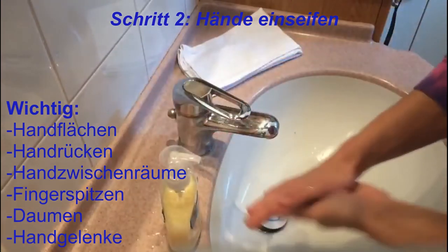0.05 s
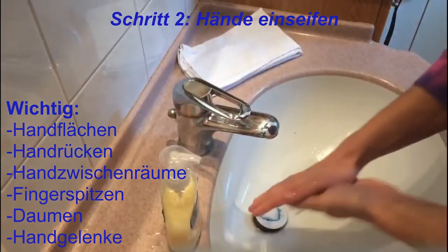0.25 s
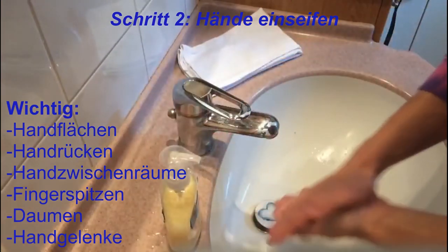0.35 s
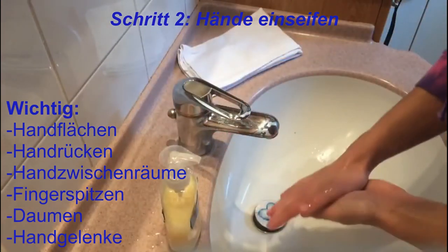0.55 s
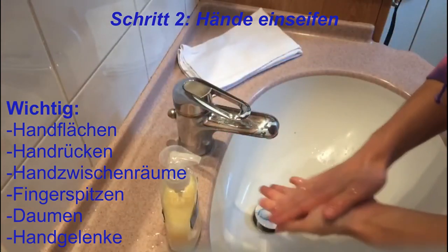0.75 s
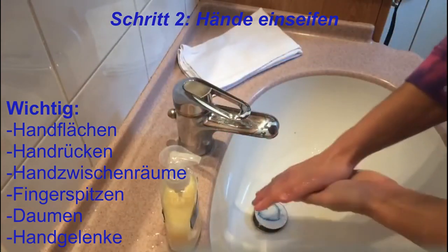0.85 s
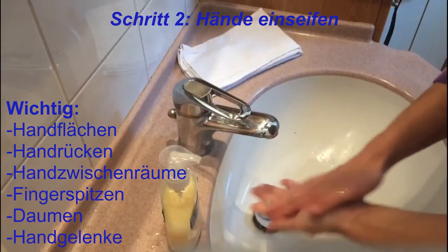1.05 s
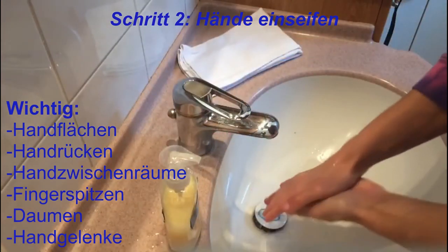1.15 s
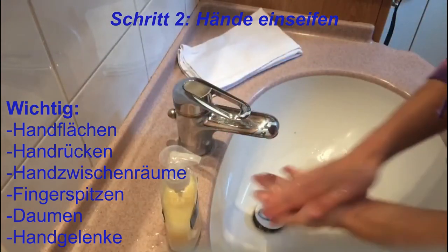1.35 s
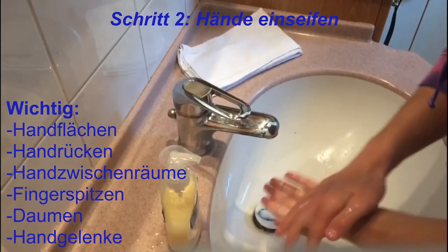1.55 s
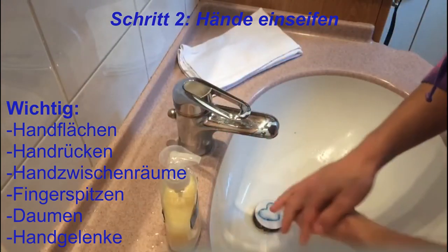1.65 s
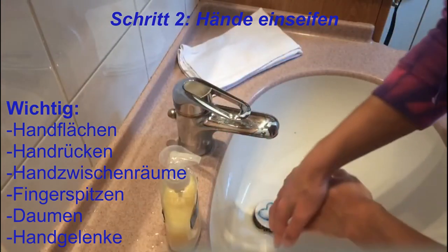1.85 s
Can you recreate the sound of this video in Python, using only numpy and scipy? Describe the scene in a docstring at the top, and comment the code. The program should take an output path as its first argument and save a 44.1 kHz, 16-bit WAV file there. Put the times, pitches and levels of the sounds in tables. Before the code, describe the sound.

Wet soapy hands rub together over a washbasin, making uneven soft squelches, slaps and small pops. Lather fizzes faintly between them, and the strongest squelches come in the second half. The small bathroom adds a short echo.

```python
"""Soapy hands over a washbasin

Wet palms meet in soft squelching slaps, trapped air pockets pop open and ring, and the lather
ticks and fizzes. The basin throws back quick reflections, the small tiled bathroom adds a short
tail, and a faint hum lies underneath."""
import sys
import numpy as np
from scipy import signal
from scipy.fft import rfft, irfft, next_fast_len
from scipy.io import wavfile

SR = 44100
rng = np.random.default_rng(int(sys.argv[2]) if len(sys.argv) > 2 else 0)


def file_out(sig):
    """Save sig as 16-bit WAV at sys.argv[1]."""
    # one column per channel
    cols = np.atleast_2d(sig).T
    # limit, then scale
    lim = np.clip(cols, -1, 1)
    pcm = np.round(lim * 32767).astype(np.int16)
    wavfile.write(sys.argv[1], SR, pcm)


N = 83790
EVENT_T = np.arange(SR // 10) / SR  # 100 ms for each slap, pop or snap
SLAP_ATTACK_S, BURST_ATTACK_S = 0.00082, 0.0003

# EQ of bursting lather, for slaps and pops: (frequency [Hz], gain [dB])
SPRAY_EQ = [(100, -22), (300, -11), (700, -3), (1500, -0.5), (3000, 3), (4300, 1.5), (5600, 2.5), (8000, 3),
            (10500, 0), (12500, -5)]
# Palm hits: (time [s], decay [s], squelch centre [Hz], squelch [dB], spray [dB], thump [dB], thud [dB])
PALM_HITS = [(0.182, 0.0049, 1380, -41.5, -54, -45, -52.5), (0.21, 0.0067, 1240, -39, -47, -46, -52.5),
             (0.4432, 0.0033, 1160, -41, -48, -46.5, -51.5), (0.482, 0.024, 1920, -52, -60, -48, -53.5),
             (0.503, 0.022, 1870, -48, -49, -57, -62), (0.805, 0.012, 1950, -50.5, -56, -58.5, -64),
             (0.932, 0.028, 2030, -52.5, -61, -62.5, -62.5), (1.035, 0.0091, 600, -70, -70, -51.5, -61),
             (1.0605, .012, 695, -45, -46, -42.5, -44.5), (1.063, 0.031, 1790, -31, -38, -36.5, -49.5),
             (1.267, 0.0059, 1240, -31.5, -41, -39.5, -56), (1.285, 0.0058, 1540, -41.5, -43, -40.5, -73),
             (1.337, 0.011, 2030, -40, -58, -62, -81), (1.4903, 0.015, 2250, -28.5, -34, -41, -48),
             (1.499, 0.016, 1620, -36, -47, -46, -54)]
def palm_slaps():
    """Lather squeezes out between the palms while the hollow of the hands thumps and the flesh thuds."""
    out, impulse = np.zeros(N), signal.unit_impulse(len(EVENT_T))
    for time_s, decay_s, hz, squelch_db, spray_db, thump_db, thud_db in PALM_HITS:
        rush = basin_reflections(crackle(decay_s, SLAP_ATTACK_S))
        squelch = at_level(band(rush, hz, octaves=1.29), squelch_db)
        splash = basin_reflections(crackle(decay_s, SLAP_ATTACK_S))
        spray = at_level(colour(splash, SPRAY_EQ), spray_db)
        thump = at_level(band(basin_reflections(impulse), hz=307.7, octaves=0.86), thump_db)
        thud = at_level(band(impulse, hz=162.5, octaves=0.94, order=1), thud_db)
        add(out, time_s, squelch + spray + thump + thud)
    return out


# Air pockets popping open: (time [s], pitch [Hz], ring t60 [s], ring [dB], spray [dB])
AIR_POCKETS = [(0.042, 2590, 0.0048, -47.5, -51.5), (0.176, 1240, 0.0062, -50, -55),
               (0.219, 1916, 0.012, -26.5, -38), (0.224, 2040, 0.024, -24.5, -39.5),
               (0.233, 4030, 0.01, -42, -47), (0.351, 2700, 0.0028, -38.5, -46.5),
               (0.364, 2130, 0.0027, -46.5, -68), (0.372, 1850, 0.0027, -46, -62),
               (0.409, 1580, 0.0084, -51.5, -66), (0.4432, 1304, 0.0095, -36, -51.5),
               (0.483, 905, 0.054, -41, -63), (0.509, 3100, 0.0033, -48.5, -65),
               (0.599, 1960, 0.004, -49.5, -60), (0.630, 1570, 0.0031, -47, -58),
               (0.64, 1884, .007, -74, -68), (0.7242, 3010, 0.0013, -38.5, -40),
               (0.738, 2950, 0.0056, -45, -70), (0.806, 2820, 0.0056, -50, -61),
               (0.878, 1513, 0.023, -51, -61), (0.937, 1680, 0.0063, -46, -60),
               (1.062, 2750, 0.011, -36, -37.5), (1.076, 3190, 0.0097, -33.5, -44),
               (1.216, 3150, 0.0042, -35, -38.5), (1.2195, 3640, 0.0034, -43, -40.5),
               (1.268, 1350, 0.0047, -38.5, -41), (1.275, 1510, 0.0023, -45, -43.5),
               (1.2926, 3280, 0.0043, -37.5, -59), (1.3373, 2340, 0.0044, -39, -46),
               (1.467, 2550, 0.0017, -47.5, -41.5), (1.473, 1760, 0.003, -36.5, -58),
               (1.4762, 2620, 0.0034, -38.5, -49), (1.4995, 4280, 0.0079, -35, -37.5),
               (1.611, 2410, 0.015, -50, -55.5), (1.793, 1850, 0.03, -61.5, -68),
               (1.804, 2160, 0.012, -55, -56.5)]
def air_pops():
    """Each pocket rings briefly, bending up in pitch, roughened by its wet rim, with a puff of spray."""
    out, t = np.zeros(N), EVENT_T
    attack_cycles, rise_per_s, width_octaves = 0.76, 1, 0.99
    for time_s, hz, t60, ring_db, spray_db in AIR_POCKETS:
        envelope = (1 - np.exp(-t * hz / attack_cycles)) * fade(t, t60)
        chirp = np.sin(2 * np.pi * hz * (t + rise_per_s * t * t / 2))
        ring = basin_reflections(band(envelope * chirp, hz, width_octaves, order=1))
        rim = band(crackle(t60 / 2, BURST_ATTACK_S), hz, width_octaves, order=3)
        puff = crackle(decay_s=0.0054, attack_s=BURST_ATTACK_S)
        spray = colour(basin_reflections(puff), SPRAY_EQ)
        pop = at_level(ring, ring_db) + at_level(rim, ring_db - 9.5) + at_level(spray, spray_db)
        add(out, time_s, pop)
    return out


# Soap films snapping: (time [s], centre [Hz], level [dB])
FILM_TICKS = [(0.0555, 9100, -45.5), (0.154, 9700, -61.5), (0.444, 10000, -51), (0.587, 9650, -55),
              (0.739, 10400, -36.5), (1.162, 9300, -59), (1.220, 7100, -38.5), (1.291, 7500, -38.5),
              (1.449, 8800, -54.5), (1.4933, 7600, -35), (1.867, 6700, -61)]
def film_snaps():
    """Thin films tear with a bright tick of only a few clicks."""
    out = np.zeros(N)
    for time_s, hz, db in FILM_TICKS:
        tear = crackle(decay_s=0.0015, attack_s=BURST_ATTACK_S, per_s=1500)
        tick = band(basin_reflections(tear), hz, octaves=0.69)
        add(out, time_s, at_level(tick, db))
    return out


# EQ of the foam: (frequency [Hz], gain [dB])
FOAM_EQ = [(200, -6), (700, 2.5), (1500, 2), (2500, 8.5), (4000, -7.5), (6000, -9), (10000, -13),
           (12500, -12)]
# Fader ride on the foam as the hands rub: (time [s], level [dB])
FOAM_RIDE = [(0, -65), (.12, -69), (.17, -60), (.3, -57.5), (.52, -58.5), (.62, -56), (.70, -77),
             (.82, -62.5), (1.0, -69), (1.17, -55), (1.32, -62), (1.42, -66), (1.55, -50), (1.68, -68.5),
             (1.82, -67), (1.9, -71.5)]
def foam_fizz():
    """Foam crackles finely between sliding skin."""
    foam = colour(bubble_clicks(N, per_s=900, spread_db=2.5), FOAM_EQ)
    return ride(FOAM_RIDE) * rms_one(foam)


def crackle(decay_s, attack_s, per_s=5000):
    """A first break, then a rush of bursting bubbles that falls by 20 dB in decay_s."""
    envelope = (1 - np.exp(-EVENT_T / attack_s)) * 10 ** (-EVENT_T / decay_s)
    clicks = bubble_clicks(len(EVENT_T), per_s, spread_db=4.5)
    clicks[int(2 * attack_s * SR)] += from_db(8.5)  # the first break
    return clicks * envelope


def bubble_clicks(size, per_s, spread_db):
    """Tiny bubbles burst as random clicks of uneven strength."""
    strength = from_db(spread_db * np.minimum(rng.exponential(1, size), 4))
    bursts = rng.random(size) < per_s / SR
    return bursts * strength * rng.choice([-1, 1], size)


# Early reflection off the basin and counter: (delay [s], gain [dB])
BASIN_TAPS = [(.0058, -13)]
def basin_reflections(x):
    """Direct sound plus quick reflections, scattered differently each time as the hands move."""
    t = EVENT_T
    response = signal.unit_impulse(len(t))
    for delay_s, db in BASIN_TAPS:
        response[int(delay_s * SR)] += from_db(db)
    scatter = rng.standard_normal(len(t)) * (t > 0.0012) * fade(t, t60=0.038)
    response += from_db(1) * scatter / np.linalg.norm(scatter)
    return signal.fftconvolve(x, response)[:len(x)]


# EQ that the basin and its corner put on the hands: (frequency [Hz], gain [dB])
BASIN_EQ = [(40, 2), (120, -0.5), (170, 2), (240, -0.5), (380, -2.5), (520, -4), (680, 0), (850, -4),
            (1200, -0.5), (2200, -1.5), (3600, -0.5), (4400, 0.5), (5100, -1.5), (6600, -3), (7900, -1.5),
            (10000, 0), (11200, -1.5), (12300, -18.5)]
# Reverb tail of the tiled room: (frequency [Hz], t60 [s], relative level [dB])
ROOM_TAIL = [(120, 0.66, -4.5), (333, 0.58, -3), (1025, 0.37, 3), (2340, 0.41, -6.5), (4330, 0.31, -2),
             (6050, 0.24, -2), (11200, 0.18, -9)]
def bathroom(x):
    """Direct sound and a tail that dies band by band, both coloured by the basin."""
    t = np.arange(SR * 3 // 4) / SR
    wet_db, predelay_s = -3.5, 0.0061
    onset = np.clip(t / predelay_s - 1, 0, 1)
    tile_boost = 1 + from_db(5.5) * np.exp(-t / 0.011)  # first echoes stand above the tail
    response = signal.unit_impulse(len(t))
    for hz in 60 * 2 ** np.arange(0, 8, 0.5):
        envelope = onset * tile_boost * fade(t, at_hz(ROOM_TAIL, hz))
        tail = band(rng.standard_normal(len(t)), hz, octaves=0.48) * envelope
        band_share = np.sqrt(hz / np.sqrt(2) / SR)  # wider bands carry more energy
        gain = from_db(wet_db + at_hz(ROOM_TAIL, hz, column=2)) * band_share
        response += gain * tail / np.linalg.norm(tail)
    return colour(signal.fftconvolve(x, response)[:N], BASIN_EQ)


# EQ of the room tone: (frequency [Hz], gain [dB])
ROOM_TONE_EQ = [(25, -22), (60, -11.5), (100, 3.5), (160, -7.5), (350, -6.5), (800, -22), (2200, -34),
                (4000, -19.5), (10000, -19.5), (13000, -42)]
# Fader ride on the hum: (time [s], gain [dB])
HUM_RIDE = [(0, 5.5), (.09, 6.5), (.14, -1.5), (.9, -0.5), (1.9, -1)]
def room_tone():
    """A quiet bed of noise with a low, wavering hum."""
    air = rms_one(colour(rng.standard_normal(N + SR), ROOM_TONE_EQ)[SR:])
    hum = rms_one(band(rng.standard_normal(N + SR), hz=93.6, octaves=0.59)[SR:])
    return from_db(-67.5) * air + from_db(-73.5) * ride(HUM_RIDE) * hum


def from_db(db):
    """Decibels to gain."""
    return 10 ** (np.asarray(db) / 20)


def fade(t, t60):
    """Decay that falls by 60 dB in t60 seconds."""
    return np.exp(-np.log(1000) * t / t60)


def ride(points):
    """Gain curve through a table of fader points."""
    return from_db(np.interp(np.arange(N) / SR, *np.transpose(points)))


def rms_one(x):
    """Scale to rms 1."""
    return x / np.sqrt(np.mean(x ** 2) + 1e-20)


def at_level(x, db):
    """Scale a short sound so that its energy, spread over 10 ms, has this level."""
    return from_db(db) * x / np.sqrt(np.sum(x ** 2) / (SR / 100) + 1e-20)


def at_hz(points, hz, column=1):
    """Read a column of a table on a log-frequency axis."""
    table = np.array(points)
    return np.interp(np.log(np.maximum(hz, 1)), np.log(table[:, 0]), table[:, column])


def band(x, hz, octaves, order=2):
    """Band-pass around a centre."""
    edges = [hz / 2 ** (octaves / 2), min(hz * 2 ** (octaves / 2), 0.45 * SR)]
    return signal.sosfilt(signal.butter(order, edges, "band", fs=SR, output="sos"), x + 1e-18)


def colour(x, eq):
    """Minimum-phase EQ: nothing rings ahead of a transient."""
    size = 2 * next_fast_len(len(x))
    gain = from_db(at_hz(eq, np.fft.rfftfreq(size, 1 / SR)))
    cepstrum = irfft(np.log(gain))
    cepstrum[1:size // 2] *= 2
    cepstrum[size // 2 + 1:] = 0
    return irfft(rfft(x, size) * np.exp(rfft(cepstrum)))[:len(x)]


def add(out, time_s, x):
    """Mix a short sound in at its cue."""
    start = max(int(time_s * SR), 0)
    out[start:start + len(x)] += x[:max(N - start, 0)]


def scene():
    """The hands in the bathroom over room tone, in mono."""
    hands = palm_slaps() + air_pops() + film_snaps() + foam_fizz()
    return (bathroom(hands) + room_tone())[None]


def record(dry):
    """A steep high cut at 12 kHz."""
    return signal.sosfilt(signal.ellip(10, 0.3, 70, 12000, fs=SR, output="sos"), dry)


dry = scene()
out = record(dry)
file_out(out)
```